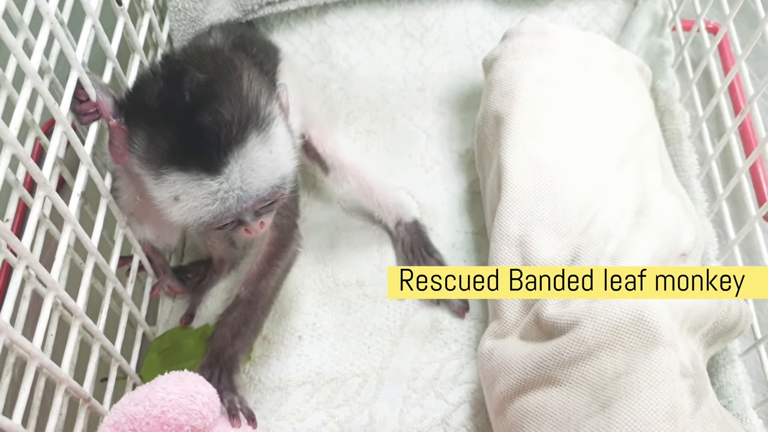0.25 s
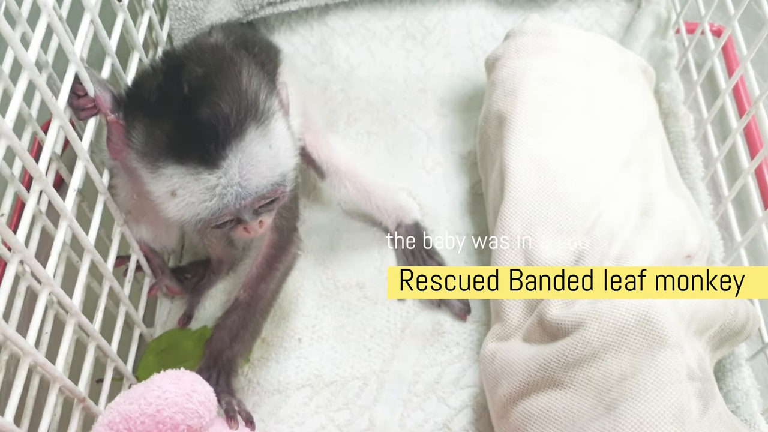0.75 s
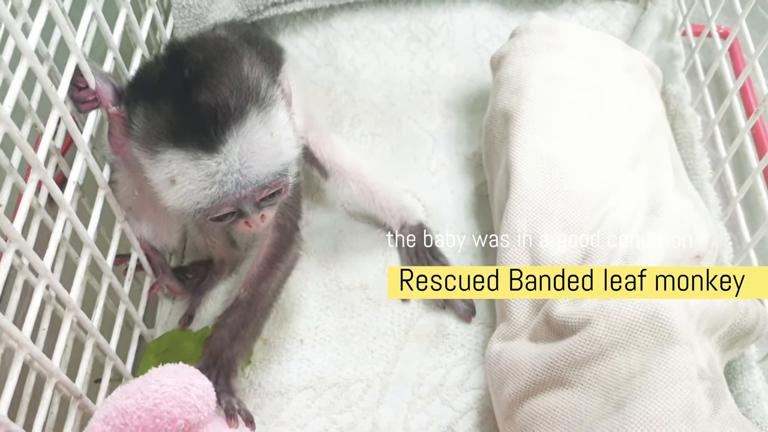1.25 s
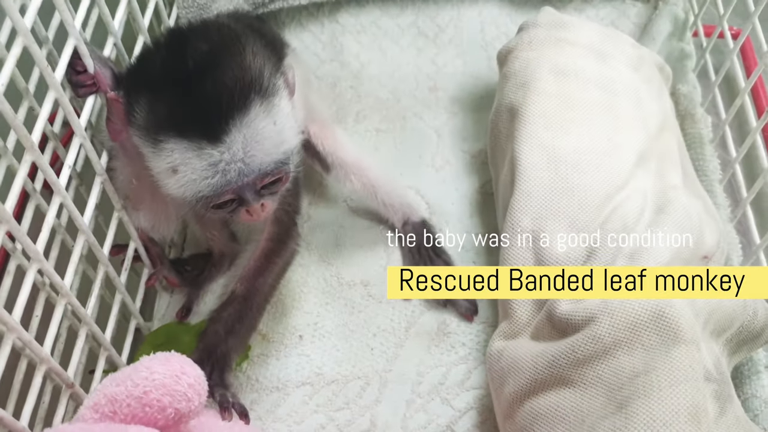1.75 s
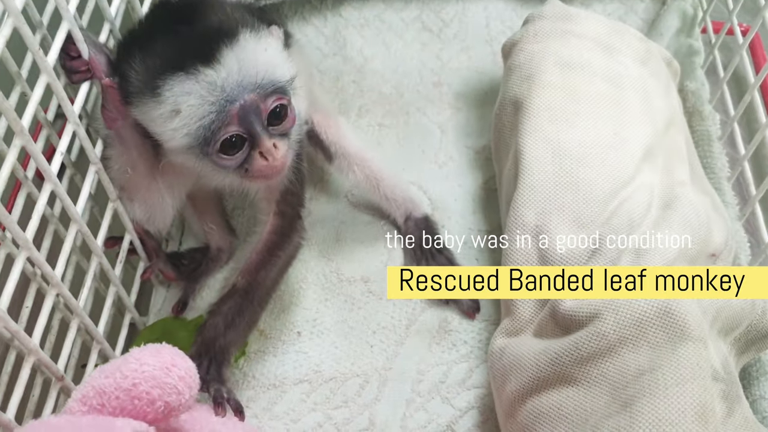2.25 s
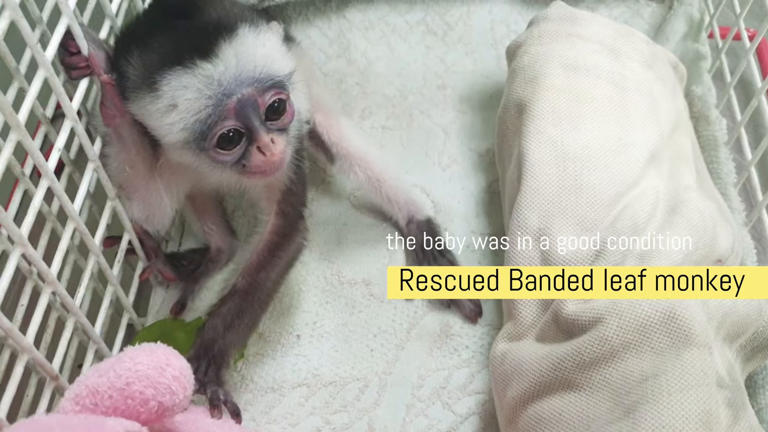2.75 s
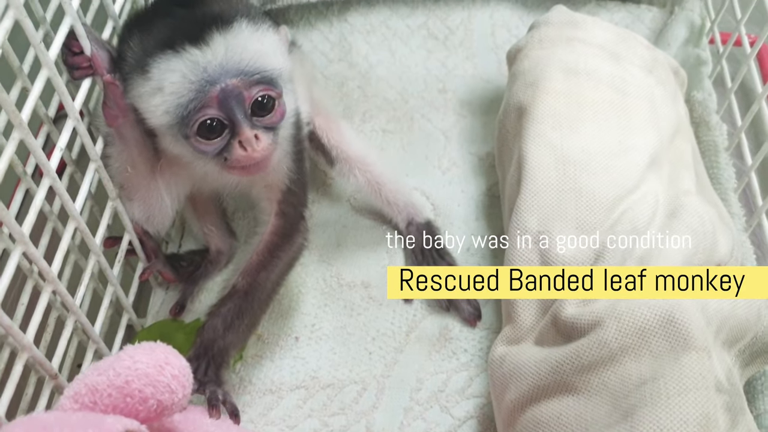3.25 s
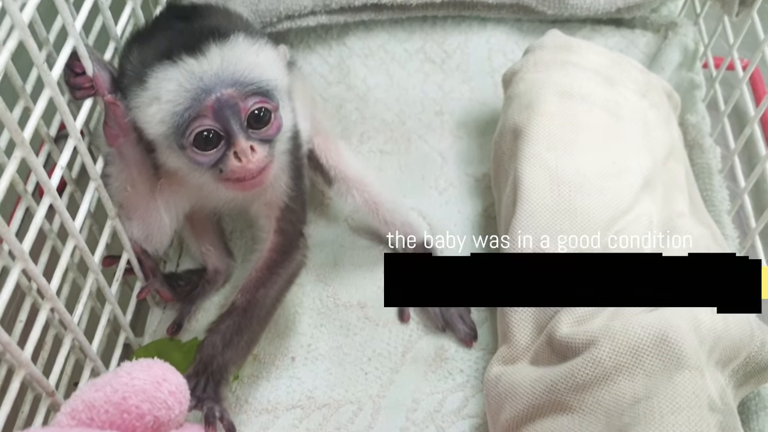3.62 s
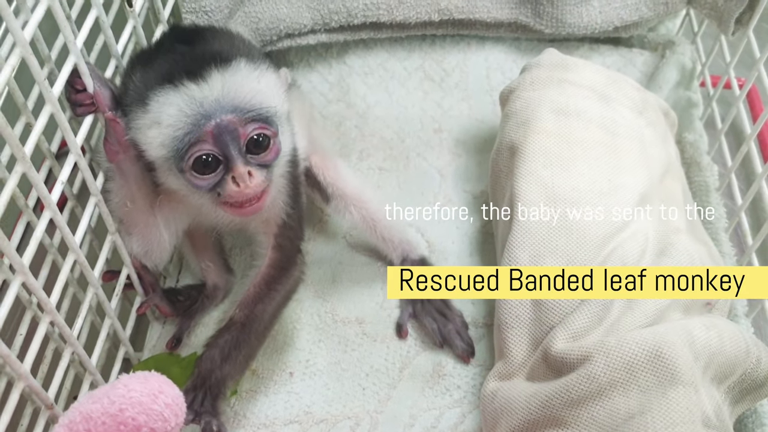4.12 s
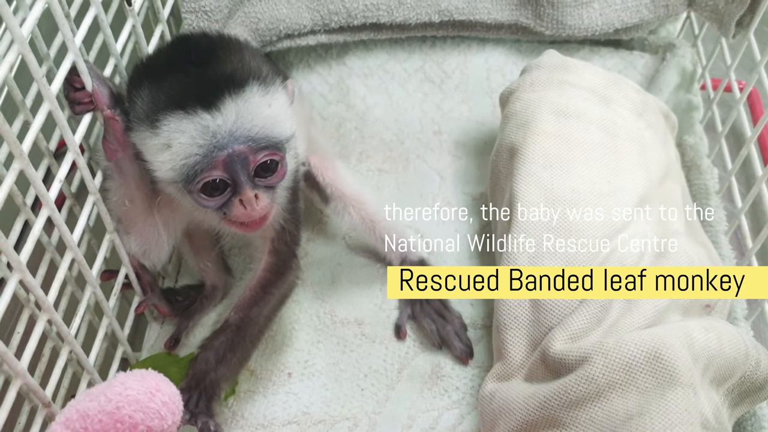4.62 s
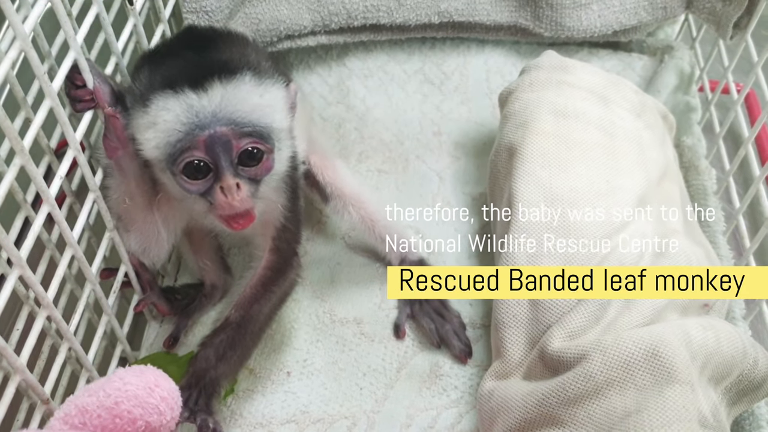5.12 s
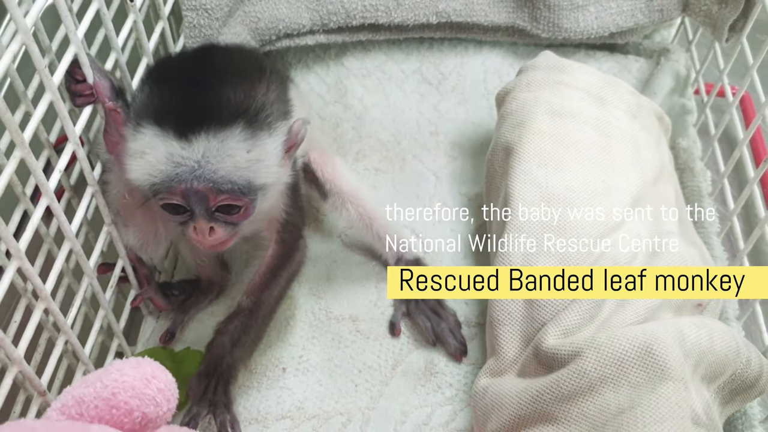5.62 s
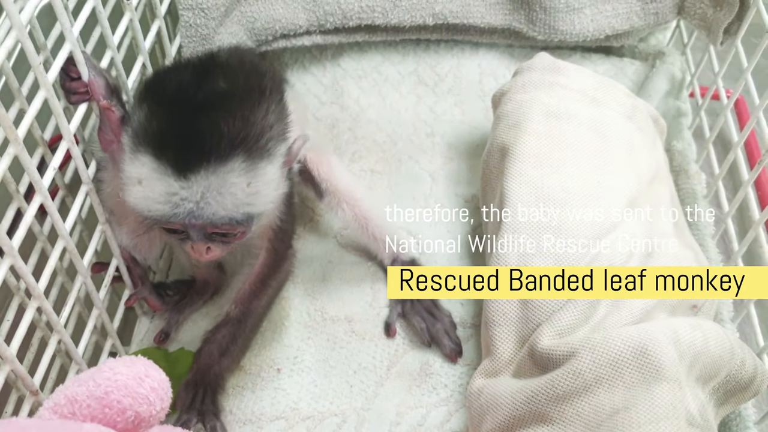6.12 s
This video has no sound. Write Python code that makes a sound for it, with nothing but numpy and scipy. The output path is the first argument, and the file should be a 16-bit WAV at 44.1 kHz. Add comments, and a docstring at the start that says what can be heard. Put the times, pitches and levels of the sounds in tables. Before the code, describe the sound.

Thin, very high baby monkey squeals ring briefly in a small hard room with low fan hum, sparse cloth rustles and a later sharp chirp.

```python
"""Ventilation hums throughout. Close to the left microphone, a baby monkey in a towel-lined plastic basket
gives a wavering squeak, a rising one and a long squeal; later a sharp chirp, a thin squeak and a faint peep.
Each is a gliding, nearly pure whistle with overtones; two strained ones carry a second oscillation.
Basket walls echo and a small hard-walled room rings after the calls; from just after the first call on,
the towel rustles now and then: shaped noise under short swells."""
import sys
import numpy as np
from scipy import signal
from scipy.fft import rfft, irfft, next_fast_len
from scipy.io import wavfile
from scipy.ndimage import uniform_filter1d

SR = 44100
rng = np.random.default_rng(int(sys.argv[2]) if len(sys.argv) > 2 else 0)


def persist_wave(psi):
    """Save psi, clipped to +-1, as 16-bit WAV."""
    counts = np.round(np.clip(psi, -1, 1) * 32767).astype(np.int16)
    wavfile.write(sys.argv[1], SR, np.atleast_2d(counts).T)


N = 280917
TIME_S = np.arange(N) / SR
CUTOFF_HZ = 15750

# ventilation strength before trim: time_s, rumble_db, hiss_db
AIRFLOW = [(0.0, -45, -57), (0.25, -44.5, -55), (1.45, -51.5, -62.5), (3.32, -50, -62),
           (3.58, -47.5, -58.5), (5.52, -49, -60), (6.33, -45, -57), (6.37, -47, -59)]
# relative noise spectra: freq_hz, density_db (per Hz)
RUMBLE_COLOUR = [(12, -50), (20, -20), (86, -2.5), (163, -2.5), (189, -2.5), (266, -4.5), (300, -1),
                 (328, -8), (386, -11), (544, -16), (700, -26.5), (910, -54.5), (1540, -120)]
HISS_COLOUR = [(300, -31), (500, -3.5), (580, -9.5), (800, -5.5), (1500, -10.5), (2700, -11), (3300, -19.5),
               (6600, -19), (7600, -26), (8300, -41.5), (11000, -27), (15000, -31), (16000, -47.5)]
# motor tones at median airflow, before panning: freq_hz, level_db (rms)
MOTOR_TONES = [(134.6, -63), (188.8, -57.5), (297, -60.5), (382.2, -66), (506.0, -69), (796.7, -72),
               (1610, -74.5), (1658, -75), (1712, -69.5), (1766, -71.5), (2492, -80), (2638, -78.5),
               (2686, -76)]
# left-right correlation of noise: freq_hz, likeness (0 to 1)
LIKENESS = [(30, .6), (120, .93), (300, .9), (700, 0.62), (1500, 0), (15000, 0)]
# left-over-right excess of noise: freq_hz, left_db
AIR_BALANCE = [(130, 9.5), (290, 8.5), (640, 13.5), (1410, 7), (3100, 4.5), (6820, 5.5), (15000, -2.5)]
# call glides, effort before colouring gain: time_s, pitch_hz, effort_db
WAVERING_SQUEAK = [(0.072, 5930, -48.5), (0.09, 5210, -42), (0.113, 7140, -34), (0.126, 7200, -32),
                   (0.143, 8200, -27), (0.161, 7160, -25), (0.182, 8660, -25), (0.223, 8150, -27.5),
                   (0.269, 8010, -22.5), (0.301, 8910, -21.5), (0.333, 7840, -17.5)]
RISING_SQUEAK = [(0.473, 4780, -33), (0.489, 5040, -28.0), (0.509, 6550, -29.5), (0.549, 7030, -31),
                 (0.563, 6460, -30)]
LONG_SQUEAL = [(0.738, 6057, -26.5), (0.795, 6200, -20.5), (0.861, 5460, -19), (0.891, 5510, -22.5),
               (0.917, 4890, -10.5), (0.961, 5026, -11.5), (0.998, 4637, -12.5), (1.038, 4680, -14),
               (1.076, 4270, -27), (1.162, 4890, -14), (1.192, 4830, -20)]
SHARP_CHIRP = [(3.717, 5270, -27.5), (3.721, 5415, -21.5), (3.742, 5670, -17.8), (3.772, 5040, -17),
               (3.785, 4726, -26)]
THIN_SQUEAK = [(5.535, 5480, -56), (5.548, 7260, -49), (5.572, 6760, -37), (5.598, 7820, -46),
               (5.634, 7470, -45.5), (5.689, 8560, -39.5), (5.744, 8800, -37)]
FAINT_PEEP = [(6.04, 4250, -63.5), (6.076, 4450, -65)]
# colouring by pitch at scale 1, peaks and notches: freq_hz, gain_db
PITCH_COLOUR = [(4250, -0.3), (4950, 0.0), (5450, 2.0), (6100, 5), (7500, 7), (8600, -8), (9750, -10.5),
                (10850, -17), (11750, 9.1), (12600, -5.5), (13700, 6.5), (15500, -8.5)]
# second oscillation: start_s, end_s, first_hz, last_hz, first_db, last_db
STRAINS = [(0.125, 0.299, 4900, 3946, -32, -21), (5.581, 5.744, 3500, 2496, -12, 7)]
# mouth gain for combination tones: freq_hz, gain_db
MOUTH = [(2500, -23), (3000, -16.5), (4200, -26), (6000, -21), (11000, -4.5), (12200, -2), (13500, -4.5),
         (15500, -33)]
# basket wall echoes: delay_s, left_db, right_db
BASKET_ECHOES = [(.0009, -29.5, -18.5), (.0021, -28, -22), (.0038, -30, -22), (.0062, -29, -24.5)]
# room decay: freq_hz, t60_s
ROOM_T60 = [(2000, 0.31), (5000, 0.66), (10000, 0.52), (15000, 0.33)]
# towel brushes, level before trim: middle_s, half_length_s, level_db
RUSTLES = [(0.375, 0.031, -57), (1.33, 0.013, -50), (3.813, .012, -46.5), (4.2, 0.016, -47.5),
           (4.195, 0.064, -59.5), (5.898, 0.0014, -56), (5.935, 0.02, -61.5)]
# relative noise spectrum: freq_hz, density_db (per Hz)
RUSTLE_COLOUR = [(1200, -36.5), (2500, -13), (4500, 3.5), (7500, -3), (10500, -3.5), (14000, -9),
                 (15500, -9)]


def from_db(db):
    """Decibels to gain."""
    return 10 ** (np.asarray(db) / 20)


def rms_one(x):
    """Scale to rms 1."""
    return x / np.sqrt(np.mean(x ** 2) + 1e-20)


def in_time(rows, t_s=TIME_S):
    """Each column of a timed table, joined by straight lines."""
    s, *columns = np.transpose(rows)
    return [np.interp(t_s, s, column) for column in columns]


def at_hz(points, hz):
    """Read a table on a log-frequency axis."""
    f, value = np.transpose(points)
    return np.interp(np.log(np.maximum(hz, 1)), np.log(f), value)


def drift(rate_hz, size=N):
    """Random wander: unit-variance points, rate_hz per second, joined by straight lines."""
    steps = rng.standard_normal(N // 2 + 1)
    return np.interp(np.arange(size) / SR * rate_hz, np.arange(len(steps)), steps)


def panned(left_db):
    """Left and right gains, left_db apart, whose mean is 1."""
    gains = from_db(np.array([[left_db], [-left_db]]) / 2)
    return gains / gains.mean()


def later(x, delay_s):
    """Delay by any fraction of a sample through a phase slope."""
    size = next_fast_len(N + SR // 10)
    hz = np.arange(size // 2 + 1) * SR / size
    return irfft(rfft(x, size) * np.exp(-2j * np.pi * hz * delay_s), size)[:N]


def air_noise(colour):
    """Coloured stereo noise, correlated in the bass, unrelated in the treble; the middle has rms 1."""
    size = next_fast_len(N)
    hz = np.arange(size // 2 + 1) * SR / size
    mid, side = rfft(rng.standard_normal((2, size)))
    alike = np.clip(at_hz(LIKENESS, hz), -1, 1)
    pair = np.sqrt(1 + alike) * mid + np.sqrt(1 - alike) * side * [[1], [-1]]
    lean = from_db(at_hz(AIR_BALANCE, hz) / 2 * [[1], [-1]])
    balance = lean / lean.mean(axis=0)
    noise = irfft(pair * balance * from_db(at_hz(colour, hz)), size)[:, :N]
    return noise / noise.mean(axis=0).std()


def motor_tones():
    """Steady sines whose level and phase waver a little."""
    total = np.zeros(N)
    for hz, level_db in MOTOR_TONES:
        level = from_db(level_db) * (1 + .4 * drift(6))
        total += level * np.sin(2 * np.pi * hz * TIME_S + .9 * drift(7))
    return np.sqrt(2) * total * panned(8)


def ventilation(flutter_db=2.13):
    """Airflow drives rumble and hiss noise; the motor tones follow the hiss level."""
    rumble_db, hiss_db = in_time(AIRFLOW)
    rumble = from_db(rumble_db - 0.08 + flutter_db * drift(7.5)) * air_noise(RUMBLE_COLOUR)
    hiss = from_db(hiss_db + 1.0) * air_noise(HISS_COLOUR)
    tones = motor_tones() * from_db(hiss_db - np.median(hiss_db))
    return rumble + hiss + tones


def strain(t_s, onset_s=.012):
    """Second oscillation's pitch and depth: it sags as it grows, fading over onset_s outside each stretch."""
    hz, depth = np.zeros(len(t_s)), np.zeros(len(t_s))
    for start_s, end_s, first_hz, last_hz, first_db, last_db in STRAINS:
        gate = np.clip(np.minimum(t_s - start_s, end_s - t_s) / onset_s + 1, 0, 1)
        hz += (gate > 0) * np.interp(t_s, [start_s, end_s], [first_hz, last_hz])
        depth += gate * from_db(np.interp(t_s, [start_s, end_s], [first_db, last_db]))
    return hz, depth


def combination_tones(t_s, pitch_hz, phase):
    """Strain adds ragged sum and difference tones; the small mouth favours those near 12 kHz."""
    strain_hz, depth = strain(t_s)
    ragged_hz = strain_hz * (1 + .065 * drift(1400, len(t_s)))
    other_phase = 2 * np.pi * np.cumsum(ragged_hz) / SR
    total = np.zeros(len(t_s))
    for k, sign in ((0, 1), (1, -1), (1, 1), (2, -1)):
        mouth_db = at_hz(MOUTH, k * pitch_hz + sign * strain_hz)
        ragged_db = 4.5 * drift(260, len(t_s))
        total += depth * from_db(mouth_db + ragged_db) * np.sin(k * phase + sign * other_phase)
    return total


def squeak(glide, overtone_db, third_db, rasp_db, bloom_db=0, quaver_hz=0, quaver=0, crest_s=0,
           colour_scale=1, jitter=.003, shimmer_db=3.0, edge_s=0.0044):
    """Tiny vocal membranes whistle along a glide; whistle and overtone flare and dip as they cross the peaks
    and notches of a fixed colouring over pitch.

    quaver and jitter are fractions of pitch; the quaver crests crest_s after the start. bloom_db is how far the
    overtone drops from mid-call to either end."""
    start_s, end_s = glide[0][0], glide[-1][0]
    span = (TIME_S > start_s - edge_s) & (TIME_S < end_s + edge_s)
    t_s = TIME_S[span]
    size = len(t_s)

    pitch_hz, effort_db = in_time(glide, t_s)
    quaver_phase = 2 * np.pi * quaver_hz * (t_s - start_s - crest_s)
    pitch_hz = uniform_filter1d(pitch_hz, size=400) * (1 + quaver * np.cos(quaver_phase))

    first_db = at_hz(PITCH_COLOUR, pitch_hz / colour_scale)
    colour_step_db = at_hz(PITCH_COLOUR, 2 * pitch_hz / colour_scale) - first_db
    off_middle = np.linspace(-1, 1, size) ** 2
    second_db = overtone_db - bloom_db * off_middle + colour_step_db

    pitch_hz = pitch_hz * (1 + jitter * drift(530, size))
    phase = 2 * np.pi * np.cumsum(pitch_hz) / SR
    tone = np.sin(phase)
    for k, harmonic_db in ((2, second_db), (3, third_db)):
        audible = np.clip((CUTOFF_HZ - k * pitch_hz) / 900, 0, 1)
        tone = tone + audible * from_db(harmonic_db) * np.sin(k * phase)
    tone += combination_tones(t_s, pitch_hz, phase)

    highpass = signal.butter(2, 4500, "high", fs=SR, output="sos")
    turbulence = signal.sosfilt(highpass, rng.standard_normal(size))
    tone += from_db(rasp_db) * turbulence

    gate = np.clip((np.minimum(t_s - start_s, end_s - t_s) + edge_s) / (2 * edge_s), 0, 1)
    level = from_db(effort_db + first_db + shimmer_db * drift(220, size))
    out = np.zeros(N)
    out[span] = np.sqrt(2) * tone * np.sin(gate * np.pi / 2) ** 2 * level
    return out


def aimed(call, left_db, room_db):
    """Head direction splits a call's power between left microphone, right microphone and room."""
    return call * np.vstack([rms_one(panned(left_db)), from_db(room_db)])


def monkey():
    """The loud calls are clean, the faint peep airy; the longer ones quaver."""
    wavering = squeak(WAVERING_SQUEAK, overtone_db=-13.5, bloom_db=7.5, third_db=-35, rasp_db=-34,
                      quaver_hz=30.69, quaver=.0201, crest_s=.0201, colour_scale=0.92, jitter=.0042)
    rising = squeak(RISING_SQUEAK, overtone_db=5.5, bloom_db=18, third_db=-27, rasp_db=-41.5,
                    colour_scale=1.013, shimmer_db=1.3)
    squeal = squeak(LONG_SQUEAL, overtone_db=-4.0, third_db=-23.5, rasp_db=-61.0,
                    quaver_hz=18.84, quaver=.007, crest_s=.0035, jitter=0.0032, shimmer_db=1.04)
    chirp = squeak(SHARP_CHIRP, overtone_db=-3, bloom_db=4.0, third_db=-25.5, rasp_db=-41.5,
                   colour_scale=0.95, jitter=0.0022, shimmer_db=1.4, edge_s=.0012)
    thin = squeak(THIN_SQUEAK, overtone_db=-1.7, bloom_db=6.0, third_db=-30, rasp_db=-38,
                  quaver_hz=19.0, quaver=0.013, crest_s=0.0034, colour_scale=1.026, jitter=0.004,
                  shimmer_db=2.7)
    peep = squeak(FAINT_PEEP, overtone_db=-9, third_db=-32, rasp_db=-21, jitter=0.021)
    return (aimed(wavering, left_db=7.0, room_db=-12)
            + aimed(rising, left_db=13.5, room_db=-18.5)
            + aimed(squeal, left_db=8.0, room_db=-16.5)
            + aimed(chirp, left_db=11.0, room_db=-16)
            + aimed(thin, left_db=14.0, room_db=-15.5)
            + aimed(peep, left_db=15, room_db=-13))


def basket(left, right, shade_hz=13000, right_lag_s=.000205):
    """The right microphone hears the voice later and duller; basket walls add quick echoes to both."""
    pole = np.exp(-2 * np.pi * shade_hz / SR)
    right = later(signal.lfilter([1 - pole], [1, -pole], right), right_lag_s)
    left_echoes = sum(from_db(left_db) * later(left, delay_s) for delay_s, left_db, _ in BASKET_ECHOES)
    right_echoes = sum(from_db(right_db) * later(right, delay_s) for delay_s, _, right_db in BASKET_ECHOES)
    return np.array([left + left_echoes, right + right_echoes])


def room(x, first_s=0.0044, build_s=0.0027):
    """Dense noise tail that builds after the first walls answer; each band decays at its own rate."""
    t_s = np.arange(SR) / SR
    edges_hz = np.geomspace(2000, 16000, 7)
    white, tail = rng.standard_normal((2, SR)), 0
    for low_hz, high_hz in zip(edges_hz, edges_hz[1:]):
        bandpass = signal.butter(2, [low_hz, high_hz], "band", fs=SR, output="sos")
        t60_s = at_hz(ROOM_T60, np.sqrt(low_hz * high_hz))
        tail = tail + signal.sosfilt(bandpass, white) * np.exp(-np.log(1000) * t_s / t60_s)
    tail = tail * np.clip((t_s - first_s) / build_s, 0, 1)
    return signal.fftconvolve(x[None], rms_one(tail) / np.sqrt(SR), axes=1)[:, :N]


def towel(grain_db=2.5):
    """Cloth brushes: coloured noise under bell-shaped swells with a fine grain."""
    swell = sum(from_db(level_db) * np.exp(-.5 * ((TIME_S - middle_s) / half_s) ** 2)
                for middle_s, half_s, level_db in RUSTLES)
    grain = from_db(-4 + grain_db * drift(500))
    return swell * grain * air_noise(RUSTLE_COLOUR) * panned(3.0)


def scene():
    """Voice arrives first and louder at the left microphone; ventilation arrives there slightly late."""
    air_left, air_right = ventilation()
    air = np.array([later(air_left, 0.00041), air_right])
    left, right, into_room = monkey()
    voice = basket(left, right) + room(into_room) * panned(2.84)
    return air + voice + towel()


def record(dry):
    """Steep low-pass at CUTOFF_HZ."""
    lowpass = signal.ellip(10, .1, 80, CUTOFF_HZ, fs=SR, output="sos")
    return signal.sosfilt(lowpass, dry)


dry = scene()
out = record(dry)
persist_wave(out)
```